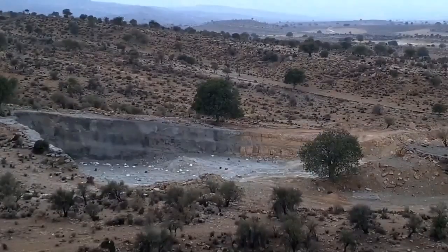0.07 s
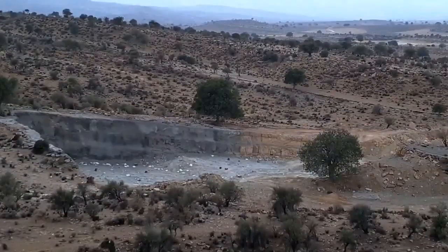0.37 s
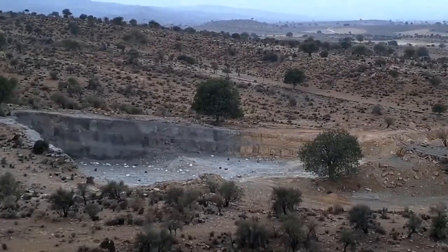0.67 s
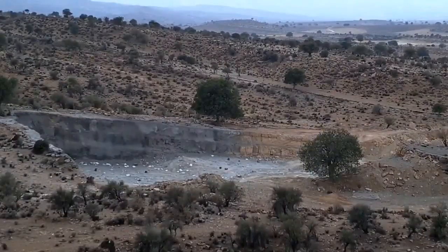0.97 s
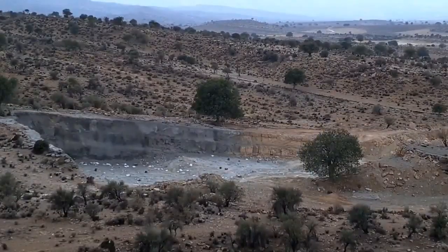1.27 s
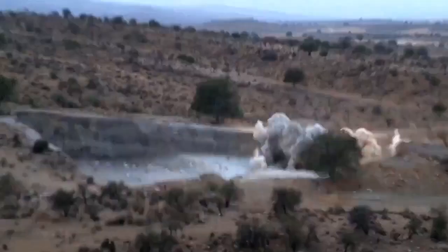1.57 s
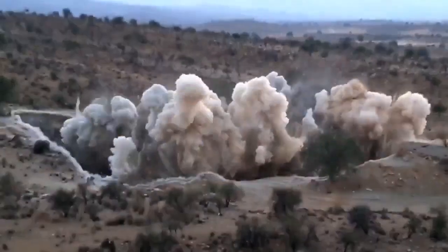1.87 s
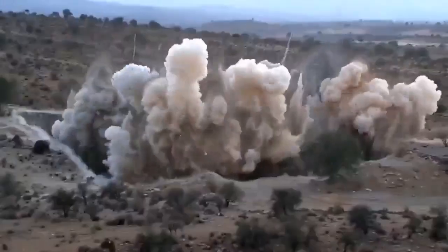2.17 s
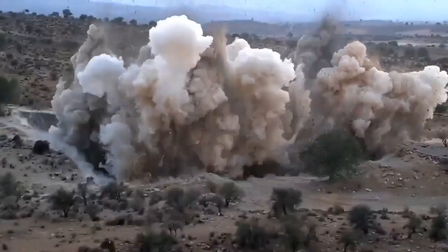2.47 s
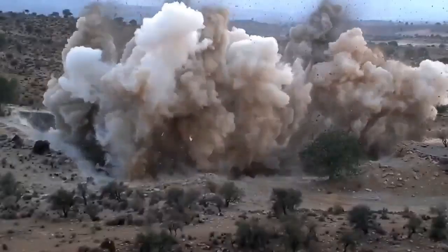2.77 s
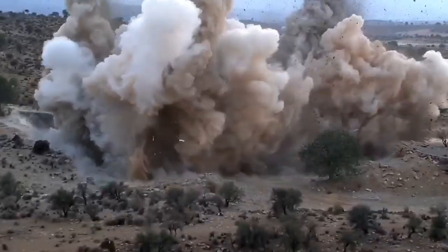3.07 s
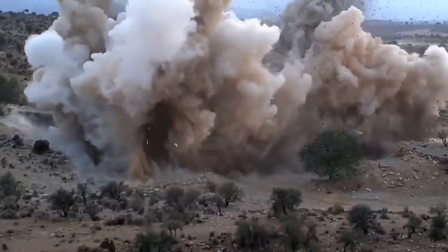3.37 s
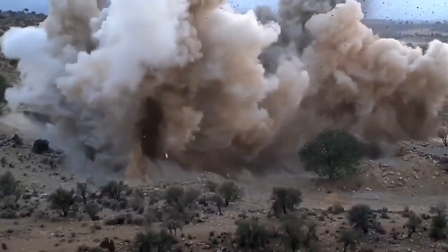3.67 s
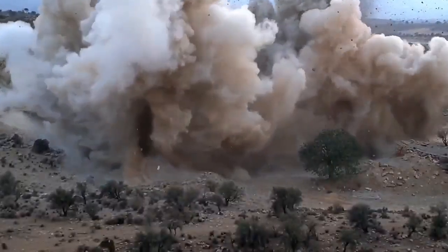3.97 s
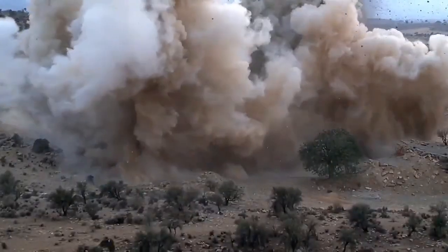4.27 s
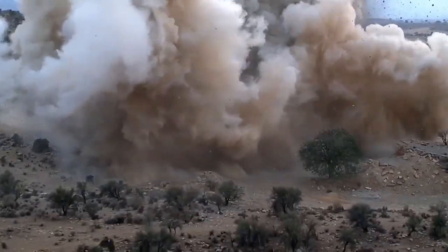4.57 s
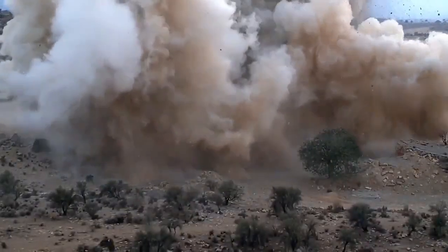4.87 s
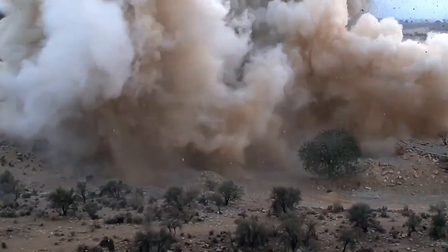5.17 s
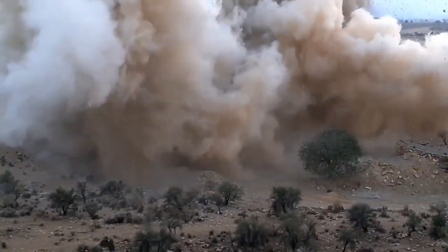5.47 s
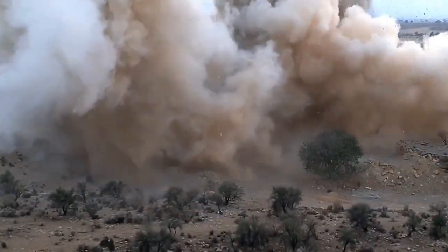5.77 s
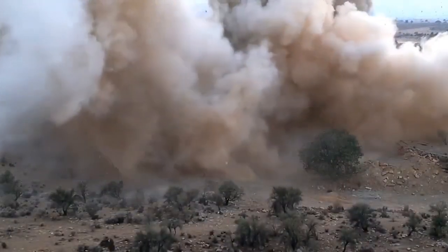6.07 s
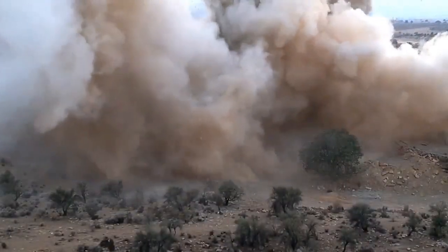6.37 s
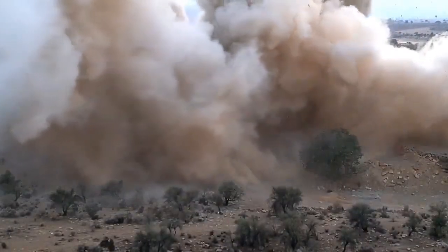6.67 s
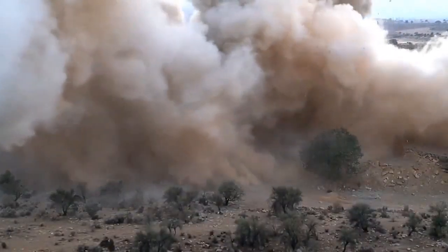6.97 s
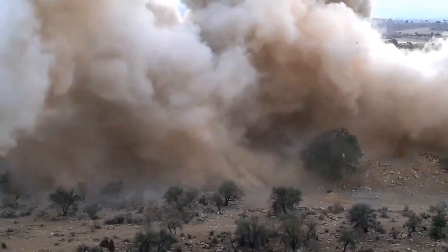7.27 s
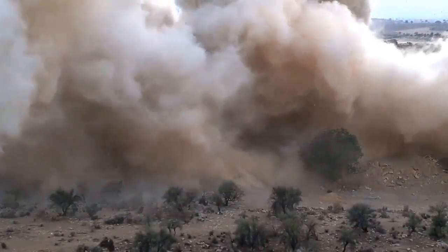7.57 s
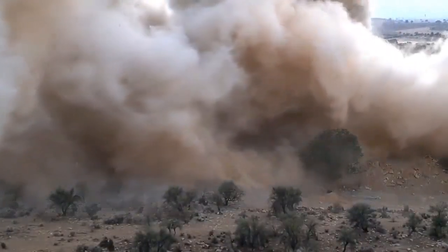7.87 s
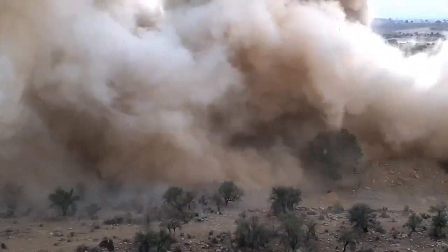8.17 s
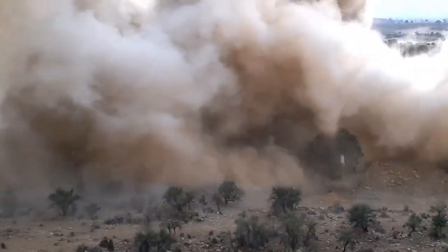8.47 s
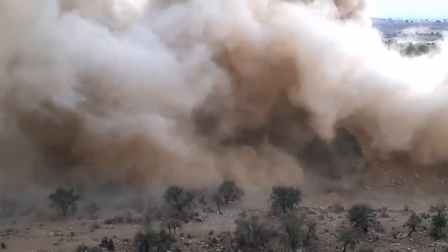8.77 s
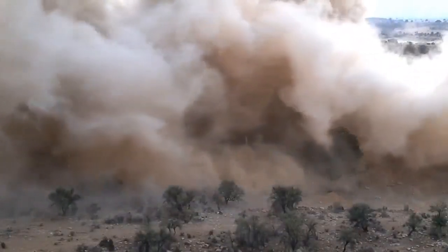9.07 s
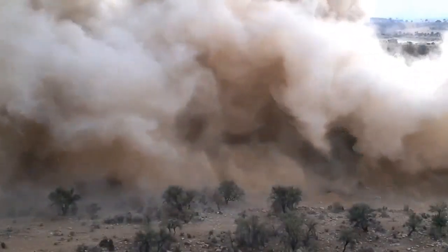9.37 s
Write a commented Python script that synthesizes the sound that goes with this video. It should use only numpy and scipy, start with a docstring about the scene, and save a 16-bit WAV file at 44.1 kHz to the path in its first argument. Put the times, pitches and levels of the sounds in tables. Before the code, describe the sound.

Wind buffets the microphone, then a quarry blast roars and rolls away, followed by a growing avalanche of thudding, clattering rock.

```python
"""A quarry face is blasted, heard from across a dry valley. First, turbulent gusts buffet the microphone.
Sound travels faster in rock than in air, so the shock arrives next as low thumps through the ground.
The face cracks, and at 2 s the air blast follows: a ragged roar of venting gas that rolls off the hills.
From 3.3 s thrown rock comes down in a growing avalanche under returning wind: boulders thud, stones
clatter and grit ticks, while sharp jolts ring the two microphone ports with a hollow clonk."""
import sys
import numpy as np
from scipy import signal
from scipy.fft import rfft, irfft, next_fast_len
from scipy.io import wavfile
from scipy.ndimage import uniform_filter1d, map_coordinates

SR = 44100
rng = np.random.default_rng(int(sys.argv[2]) if len(sys.argv) > 2 else 0)


def dump_mix(stems):
    """Bounce the given channels to the path in sys.argv[1] as a 16-bit WAV at rate SR."""
    frames = np.atleast_2d(stems).T  # one column per channel
    limited = np.clip(frames, -1, 1)  # hard clip at full scale
    pcm = np.round(limited * 32767).astype(np.int16)
    wavfile.write(sys.argv[1], SR, pcm)


N = 424683
TOP_HZ = 15900  # upper band limit
PORT_LAG_S = .00035  # the blast reaches the left port later
LOW_RING_HZ, HIGH_RING_HZ = 855, 1473  # two hollow resonances of the microphone ports

# spectra of the blast, coarse rock and fine rock: (frequency [Hz], relative level [dB])
ROAR_SPECTRUM = [(201, -21), (275, -2), (448, -1), (612, -10), (854, -8), (1190, -18), (1660, -17.5),
                 (2310, -24), (2870, -25), (8730, -41), (14800, -32.5), (16000, -55)]
RUBBLE_SPECTRUM = [(215, -21.5), (300, -0.5), (350, 2.5), (419, -1.5), (636, -5.5), (847, -3.5),
                   (1270, -12.5), (1770, -12), (2340, -26.5), (2600, -22), (3380, -44.5), (5720, -120)]
GRAVEL_SPECTRUM = [(1180, -29), (2000, 3.5), (2340, -13), (2810, -2), (3400, -10), (3950, -7),
                   (4900, -10.5), (5600, -7), (6100, -11.5), (6850, -9.5), (8630, -19), (10800, -16),
                   (14300, -20.5), (16000, -23.5)]


def amp(db):
    """Amplitude ratio of a level in decibels."""
    return 10 ** (np.asarray(db) / 20)


def unit(x):
    """Normalisation to rms 1."""
    return x / np.sqrt(np.mean(x ** 2) + 1e-20)


def along(points, hz):
    """Interpolation of (frequency [Hz], value) points on a logarithmic frequency axis."""
    frequencies, values = np.transpose(points)
    return np.interp(np.log(hz + 1), np.log(frequencies), values)


def wobble(rate):
    """Smooth random modulation: a spline through `rate` knots a second."""
    knots = rng.standard_normal(int(N * rate / SR) + 4)
    return map_coordinates(knots, [np.arange(N) * rate / SR])


def held(start_s, level_db, hold_s, release, attack=2500):
    """Exponential rise until start_s, a plateau, then exponential decay; slopes in dB/s."""
    t = np.arange(N) / SR - start_s
    return amp(level_db + attack * np.minimum(t, 0) - release * np.maximum(t - hold_s, 0))


def swell(hz, cycles):
    """Time axis and envelope of a wave packet, which rises and falls over a few cycles."""
    t = np.arange(-SR // 25, SR // 25) / SR
    return t, np.hanning(len(t)) / np.cosh(t * hz / cycles)


def add(track, s, sound):
    """Superposition: mix a stereo sound in at time s."""
    start = max(round(s * SR), 0)
    track[:, start:start + sound.shape[1]] += sound[:, :max(N - start, 0)]


def coloured(x, gain):
    """Minimum-phase filtering by gain(hz); folding the cepstrum makes the response causal."""
    size = 8192
    cepstrum = irfft(np.log(np.maximum(gain(np.fft.rfftfreq(size, 1 / SR)), 1e-6)))
    cepstrum[1:size // 2] *= 2
    cepstrum[size // 2 + 1:] = 0
    response = irfft(np.exp(rfft(cepstrum)))
    return signal.fftconvolve(np.atleast_2d(x), response[None], axes=1)[:, :x.shape[-1]]


def band(spectrum, low_hz, high_hz, order=8):
    """Gain function of one part of a spectrum, cut out by Butterworth slopes."""
    def gain(hz):
        low_cut = 1 + (low_hz / (hz + 1)) ** (2 * order)
        high_cut = 1 + (hz / high_hz) ** (2 * order)
        return amp(along(spectrum, hz)) / np.sqrt(low_cut * high_cut)
    return gain


def burst(t60, gain):
    """A transient of coloured stereo noise with exponential decay; peak 1."""
    t = np.arange(SR // 8) / SR
    puff = coloured(rng.standard_normal((2, len(t))) * amp(-60 * t / t60), gain)
    return puff / np.abs(puff).max()


def impacts(rate, spread_db, wash):
    """Shot noise in mid and side: `rate` random pulses a second over a wash of countless small ones."""
    count = int(rate * N / SR)
    when, size, lag, sign, side = rng.random((count, 5)).T
    push = np.sign(sign - .5) * amp(-spread_db * np.log(size + 0.015))
    at = (when * (N - 1)).astype(int)
    mid = np.bincount(at, push, N)
    across = np.bincount(at + (lag * 20).astype(int), push * (side - .5), N)[:N]
    return np.array([unit(mid), unit(across)]) + wash * rng.standard_normal((2, N))


def widen(mid, side):
    """Sum and difference give left and right; the ports differ most at their resonances."""
    # stereo width: (frequency [Hz], side gain [dB])
    width = [(99, -10), (160, -6), (270, -10.5), (450, -14.5), (690, -4), (860, 2.5), (1150, -4),
             (1470, 3.5), (1850, -1.5), (3330, 0.5), (5500, -4), (15000, -5)]
    side = coloured(side, lambda hz: amp(along(width, hz)))[0]
    return np.array([mid + side, mid - side])


def spread(pair, gain, crossing=0):
    """Random fading in time and frequency, then filtering: mid and side in, left and right out."""
    spectra = signal.stft(pair, nperseg=512)[2]
    patches = uniform_filter1d(rng.standard_normal(spectra.shape[1:]), size=5, axis=0)
    patches = uniform_filter1d(patches, size=5, axis=1)
    faded = signal.istft(spectra * amp(2 * unit(patches)), nperseg=512)[1][:, :N]
    mid, side = coloured(faded, gain)
    # a share of the sound crosses from one port to the other a moment later
    side = np.sqrt(abs(1 - crossing ** 2)) * side + crossing * np.roll(mid, round(PORT_LAG_S * SR))
    return widen(mid, side) / np.std(mid)


def hiss():
    """The noise floor: faint, steady Gaussian noise that falls off in the treble."""
    # hiss spectrum: (frequency [Hz], relative level [dB])
    spectrum = [(2000, -2.5), (8000, -8), (14000, -14.5)]
    return amp(-75) * unit(coloured(rng.standard_normal((2, N)), lambda hz: amp(along(spectrum, hz))))


def wind_strength():
    """Gains of buffet and flutter: arched gusts add in power to a breeze; steadier wind comes later."""
    # gusts: (start [s], length [s], buffet level [dB], flutter level [dB])
    gusts = [(0.01, 0.11, -24.5, -63.5), (0.126, 0.021, -25.5, -52), (0.404, 0.43, -23, -58),
             (0.646, 0.052, -18, -47), (0.939, 0.29, -26.5, -40.5), (1.032, 0.038, -26, -33.5),
             (1.098, 0.018, -32, -33), (1.391, 0.017, -27, -41.5), (1.413, 0.26, -30.5, -47.5),
             (1.527, 0.014, -32, -38.5), (1.558, 0.023, -27, -30), (1.669, 0.18, -24.5, -48.5),
             (1.845, 0.18, -23.5, -31)]
    # wind after the blast: (time [s], relative level [dB])
    late_wind = [(3.55, -45), (4.2, -40), (4.85, -35.5), (5.5, -33.5), (5.9, -39), (6.9, -38.5), (7.4, -43),
                 (9.55, -40)]
    # moments of calm: (time [s], half length [s], depth [dB])
    lulls = [(0.898, 0.029, 21), (5.122, 0.055, 15), (6.29, 0.11, 13)]
    rise, fall = 379.5, 350.5  # dB/s
    breeze_db, arch_db, flutter_swing = -45, 5.5, 1.9
    t = np.arange(N) / SR
    times, levels = np.transpose(late_wind)
    late = amp(np.interp(t, times, levels) + 7) * held(times[0], 0, N / SR, 0, attack=rise)
    buffet = np.maximum(late, amp(breeze_db))
    flutter = late * amp(-18) + amp(-91.5)
    for start, length, buffet_db, flutter_db in gusts:
        arch = amp(-arch_db * np.clip(2 * (t - start) / length - 1, -1, 1) ** 2)
        gust = arch * held(start, 0, length, fall, attack=rise)
        buffet = np.hypot(buffet, amp(buffet_db) * gust)
        flutter = np.hypot(flutter, amp(flutter_db) * gust ** flutter_swing)
    lull = amp(-sum(db * np.exp(-((t - s) / half) ** 4) for s, half, db in lulls))
    return buffet * lull, flutter * lull


def wind():
    """Turbulent pressure: eddies hit each port on its own, and the faster ones flutter higher."""
    # spectra of slow and fast eddies: (frequency [Hz], relative level [dB])
    buffet_spectrum = [(25, -19), (75, 3), (140, -6.5), (270, 2.5), (400, -4.5), (600, -15.5), (900, -20.5)]
    flutter_spectrum = [(600, 9.5), (850, 3.5), (1200, -14), (2000, -32), (4000, -52.5), (15000, -63.5)]
    # eddies that slap the ports: (time [s], relative level [dB], centre frequency [Hz])
    eddy_slaps = [(0.079, -4, 203), (0.141, -8, 267), (0.496, -7.5, 356), (0.58, -12, 234), (0.67, -8, 350),
                  (0.687, -7, 187), (1.045, -9, 400), (1.163, -10, 460), (1.396, -9.5, 353),
                  (1.437, -4, 387), (1.531, -15, 380), (1.575, -10.5, 343), (1.949, -14, 480)]
    buffet, flutter = wind_strength()
    slaps, surge = np.zeros((2, N)), np.ones((2, N))
    for s, db, hz in eddy_slaps:
        t, push = swell(hz, cycles=0.82)
        phase = 2 * np.pi * rng.random() + rng.uniform(-0.87, 0.53, (2, 1))
        add(slaps, s + 0.0021 + t[0], amp(db - 6.5) * push * np.cos(2 * np.pi * hz * t + phase))
        add(surge, s + 0.0026 + t[0], push[None])  # each slap stirs up the flutter
    eddies = amp(1.8 * wobble(70) + 1.8 * np.array([wobble(90), wobble(90)]))
    stir = lambda gain: unit(eddies * coloured(rng.standard_normal((2, N)), gain))
    slow = amp(-2) * buffet * stir(band(buffet_spectrum, 20, 430))
    blend = buffet * (flutter / (buffet + 1e-9)) ** 0.54
    medium = amp(8.5) * blend * stir(band(buffet_spectrum, 398, 618))
    crackles = unit(amp(3.7 * wobble(170)))
    fast = amp(5.5) * flutter * surge * crackles * stir(band(flutter_spectrum, 610, TOP_HZ))
    return (slow + medium + fast + slaps) * amp([[.6], [-.6]])


def port_clonks():
    """Cavity resonance: a jolt rings the air in the ports, the two sides nearly in antiphase."""
    # sharp jolts: (time [s], peak level [dB], resonance [Hz])
    jolts = [(4.007, -23, LOW_RING_HZ), (4.503, -19, LOW_RING_HZ), (4.68, -11, LOW_RING_HZ),
             (5.205, -21.5, HIGH_RING_HZ), (5.286, -10, LOW_RING_HZ), (5.452, -4, HIGH_RING_HZ),
             (6.151, -21, LOW_RING_HZ), (6.18, -19, LOW_RING_HZ), (6.298, -17, HIGH_RING_HZ),
             (6.724, -10.5, LOW_RING_HZ), (6.9953, -7, HIGH_RING_HZ), (7.8, -14, HIGH_RING_HZ),
             (8.187, -12, LOW_RING_HZ), (8.205, -11.5, HIGH_RING_HZ), (8.33, -12, HIGH_RING_HZ),
             (8.448, -16, HIGH_RING_HZ), (8.579, -14, LOW_RING_HZ), (8.698, -12, LOW_RING_HZ),
             (9.086, -8, HIGH_RING_HZ), (9.117, -11, LOW_RING_HZ), (9.372, -12.5, LOW_RING_HZ),
             (9.598, -8.5, HIGH_RING_HZ)]
    cycles_to_peak = 2.9
    out, t = np.zeros((2, N)), np.arange(SR // 25) / SR
    for s, db, hz in jolts:
        age = t * hz / cycles_to_peak
        phase = rng.normal(0, 0.14, (2, 1)) + np.pi * np.arange(2)[:, None]
        add(out, s, amp(db) * age * np.exp(1 - age) * np.sin(2 * np.pi * hz * t + phase))
    return out


def hills(x):
    """Reverberation: the slopes scatter a dull, diffuse tail, different on each side."""
    # decay in the valley: (frequency [Hz], reverberation time [s])
    decay_times = [(150, 0.56), (8000, 0.062)]
    hz, t, spectra = signal.stft(rng.standard_normal((2, SR)), SR, nperseg=256)
    decay = amp(-60 * t / along(decay_times, hz)[:, None])
    tail = signal.istft(spectra * decay, SR, nperseg=256)[1]
    return signal.fftconvolve(x, tail / np.linalg.norm(tail[0]), axes=1)[:, :N]


def ground():
    """Seismic waves: the charges fire in turn, each heaving the ground, which trembles on."""
    # spectrum of the tremor: (frequency [Hz], relative level [dB])
    rumble = [(20, -32), (42, -4.5), (55, 0.5), (77, 4), (105, -4), (220, -14.5), (400, -63)]
    # shocks through the ground: (time [s], relative level [dB])
    shocks = [(1.682, -8.5), (1.741, -14), (1.761, -12.5), (1.791, -11.5), (1.858, -15), (1.905, -13),
              (1.937, -6.5), (1.968, -16)]
    thump_hz, t60_s, attack_s = 74, 0.085, 0.0034
    tremor = spread(rng.standard_normal((2, N)), lambda hz: amp(along(rumble, hz)))
    heave = held(start_s=1.75, level_db=-30.5, hold_s=0.87, release=20) * tremor
    t = np.arange(SR // 8) / SR
    envelope = amp(-60 * t / t60_s) * (1 - np.exp(-t / attack_s))
    for s, db in shocks:
        hz = thump_hz * np.exp(rng.normal(0, 0.13))
        thump = envelope * np.sin(2 * np.pi * hz * t)
        add(heave, s, amp(db + 3) * thump[None])
    return heave * amp([[-1.3], [1.3]])


def pebbles(rate, pitch_hz, cycles, spread_db):
    """Damped free vibration: each struck pebble rings briefly at its own pitch; stereo, rms 1."""
    count = int(rate * N / SR)
    when, size, lag, side = rng.random((count, 4)).T[:, :, None]
    hz = np.clip(pitch_hz * np.exp(.4 * rng.standard_normal((count, 1))), 1200, 7000)
    samples = np.arange(SR // 50)
    t = samples / SR
    strength = amp(-spread_db * np.log(size + 0.023)) * (pitch_hz / hz) ** .5
    ring = strength * np.sin(2 * np.pi * hz * t) * np.exp(-hz * t / cycles) * (1 - np.exp(-hz * t))
    at = (when * N).astype(int) + samples
    left = np.bincount(at.ravel(), (ring * np.sqrt(side)).ravel(), N)[:N]
    right = np.bincount((at + (lag * 10).astype(int)).ravel(), (ring * np.sqrt(1 - side)).ravel(), N)[:N]
    return unit(np.array([left, right]))


def rock_flow():
    """Granular flow: the gains of boulders, stones, gravel and sand grow as powers of it, sand last."""
    # flow of the sliding rock: (time [s], level [dB])
    flow = [(3.3, -62.5), (3.6, -54.5), (3.95, -48), (4.45, -44.5), (5.85, -45.5), (6.6, -42.5),
            (7.0, -37.5), (7.3, -39.5), (8.05, -39.5), (8.45, -35.5), (9.6, -37.5)]
    # showers as slabs give way: (start [s], length [s], stone level [dB], boulder level [dB])
    showers = [(3.645, 0.38, -42.5, -48), (4.507, 0.11, -34.5, -35), (4.837, 0.014, -26.5, -36),
               (5.2, 0.06, -32, -32), (5.267, 0.024, -25, -27), (5.455, 0.18, -41, -37),
               (6.728, 0.055, -21.5, -35), (6.83, .07, -28.5, -39), (6.958, 0.14, -24.5, -32.5)]
    full_flow_db, sand_free_s = -37, 5.68
    flow_rise, sand_rise = 60.5, 17  # dB/s
    t = np.arange(N) / SR
    times, levels = np.transpose(flow)
    flow_db = np.interp(t, times, levels) - full_flow_db + flow_rise * np.minimum(t - times[0], 0)
    boulders = amp(-27 + 0.92 * flow_db)
    stones = amp(-29 + 0.76 * flow_db)
    gravel = amp(-37.5 + flow_db)
    sand = amp(-48.5 + 1.4 * flow_db + sand_rise * np.minimum(t - sand_free_s, 0))
    for start, length, stones_db, boulders_db in showers:
        shower = held(start, 0, length, release=380, attack=900)
        stones = np.hypot(stones, amp(stones_db) * shower)
        boulders = np.hypot(boulders, amp(boulders_db) * shower)
    return boulders, stones, gravel, sand


def avalanche():
    """Countless collisions sum incoherently: the smaller the rock, the higher its knocks."""
    boulders, stones, gravel, sand = rock_flow()
    clumps = wobble(35)
    fine = gravel * (sand / (gravel + 1e-9)) ** 0.25  # the gravel brightens as the sand starts to run
    thuds = boulders * spread(impacts(110, 2.2, wash=0.72), band(RUBBLE_SPECTRUM, 263, 626))
    clatter = stones * spread(impacts(220, 2.6, wash=0.98), band(RUBBLE_SPECTRUM, 633, 2620))
    rattle = amp(-2) * gravel * spread(impacts(500, 3.3, wash=1), band(GRAVEL_SPECTRUM, 2090, 3540))
    grit = fine * spread(impacts(900, 3.9, wash=1.26), band(GRAVEL_SPECTRUM, 3340, 7980))
    clacks = fine * pebbles(rate=70, pitch_hz=2700, cycles=8, spread_db=5.2)
    trickle = sand * amp(2.5 * wobble(40))
    fizz = trickle * spread(impacts(560, 4.2, wash=1), band(GRAVEL_SPECTRUM, 8500, TOP_HZ))
    return (thuds + clatter) * amp(1.18 * clumps) + (rattle + grit + clacks + fizz) * amp(1.43 * clumps)


def landings():
    """Inelastic impact: a boulder lands with a heavily damped knock; smaller rocks crunch more."""
    # heavy landings: (time [s], level [dB], pitch [Hz])
    falls = [(4.003, -15.5, 440), (4.503, -12.5, 382), (4.627, -14.5, 454), (4.682, -10.5, 387),
             (4.841, -11, 474), (4.932, -14, 450), (5.233, -14, 320), (5.287, -11, 804), (5.452, -8.5, 407),
             (5.627, -11.5, 330), (5.986, -18, 438), (6.151, -16, 827), (6.911, -11, 328),
             (6.994, -11.5, 865), (7.095, -11, 330), (7.296, -16, 556), (7.6, -1.5, 340),
             (7.702, -11.5, 325), (7.8, -12.5, 596), (7.885, -13, 390), (8.092, -11, 325),
             (8.333, -12.5, 349), (8.411, -11, 420), (8.48, -9, 323), (8.557, -10.5, 417),
             (8.673, -12, 370), (8.697, -9.5, 390), (8.837, -10.5, 360), (8.971, -6.5, 395),
             (9.117, -9, 520), (9.271, -11.5, 400), (9.346, -13, 513), (9.369, -7, 397), (9.598, -8, 560)]
    t60_s, attack_s, crunch_db_per_octave = 0.044, 0.00072, 5
    out, t = np.zeros((2, N)), np.arange(SR // 8) / SR
    for s, db, hz in falls:
        age = np.maximum(t - rng.uniform(0, 0.00033, (2, 1)), 0)  # each port has its own delay
        ring = np.sin(2 * np.pi * hz * age) * amp(-60 * age / t60_s) * (1 - np.exp(-age / attack_s))
        knock = coloured(ring, lambda f: 1 / np.sqrt(1 + (250 / (f + 1)) ** 8))
        crunch_db = -4.5 + crunch_db_per_octave * np.log2(hz / 400)
        crunch = amp(crunch_db) * burst(t60=0.047, gain=band(RUBBLE_SPECTRUM, 400, 2100))
        add(out, s, amp(db) * (knock + widen(*crunch)))
    return out


def chips():
    """Brittle fracture: rock splits with a bright snap, and the broken piece clacks at its resonance."""
    # splitting stone: (time [s], snap level [dB], relative clack level [dB], clack pitch [Hz])
    splits = [(1.697, -64, 16, 1800), (1.76, -68.5, 23, 1870), (1.877, -32.5, -4, 1900),
              (1.906, -28, -4, 1620), (2.0215, -16.5, 5.5, 1955), (2.136, -12.5, -8.5, 1590),
              (2.178, -12, -8, 1810), (2.2817, -17, -2.5, 2030), (6.044, -23, -7, 1640),
              (6.2985, -24, 7.5, 2000), (7.298, -28, 3, 1750), (7.801, -29.5, 9, 1600),
              (7.9738, -17, -13, 1970), (8.328, -17, 0, 3520), (8.558, -24.5, 6.5, 2900),
              (8.94, -18.5, -3, 1840), (9.3677, -22, 6.5, 2200)]
    out = np.zeros((2, N))
    for s, db, clack_db, hz in splits:
        snap = burst(t60=0.041, gain=band(GRAVEL_SPECTRUM, 3500, TOP_HZ))
        resonance = lambda f: (1 + (2 * (f / hz - hz / (f + 1))) ** 2) ** -2
        clack = amp(clack_db + 6) * burst(t60=0.031, gain=resonance)
        add(out, s, amp(db) * (snap + clack))
    return out


def fracture():
    """Acoustic emission: cracks run through the face, a crackle that builds before the gas escapes."""
    crackle = spread(impacts(500, 4, wash=.6), band(ROAR_SPECTRUM, 1300, 7000, order=2))
    envelope = held(start_s=1.872, level_db=-47.5, hold_s=-0.06, release=110, attack=259)
    return envelope * amp(2.5 * wobble(80)) * crackle


def booms():
    """Sudden expansion: big pockets of gas break out, each a pressure pulse a few cycles long."""
    # heaviest bursts of gas: (time [s], peak level [dB], centre frequency [Hz])
    pockets = [(2.113, -12, 480), (2.219, -6, 451), (2.238, -5.5, 358), (2.264, -6, 383),
               (2.309, -6.5, 322), (2.325, -11.5, 260)]
    out, lag = np.zeros((2, N)), np.array([[PORT_LAG_S], [0]])
    for s, db, hz in pockets:
        t, push = swell(hz, cycles=1.4)
        add(out, s + t[0], amp(db) * push * np.cos(2 * np.pi * (hz * (t - lag) + rng.random())))
    return out


def blast():
    """Gas leaves the holes as shock waves, the treble dying first; the hills reflect a smooth roll."""
    arrival_s, surge_s, echo_s = 2.022, 2.24, 2.73
    crossing, air_loss_db_per_hz = .35, .0014
    t = np.arange(N) / SR
    surge = amp(4.5 * np.exp(-((t - surge_s) / .035) ** 2))  # venting peaks just before it dies
    pulsing = amp(.8 * wobble(110))  # the holes vent unevenly
    roar = spread(impacts(400, 1.3, wash=0.86), band(ROAR_SPECTRUM, 200, 1036))
    roar *= held(arrival_s, level_db=-17.5, hold_s=0.32, release=130)
    crackle = spread(impacts(800, 3, wash=.85), band(ROAR_SPECTRUM, 854, 7000), crossing)
    crackle *= held(arrival_s, level_db=-20, hold_s=0.14, release=67)
    tearing = spread(impacts(1200, 4.4, wash=.7), band(ROAR_SPECTRUM, 5700, TOP_HZ))
    tearing *= held(arrival_s, level_db=-30, hold_s=0.17, release=300)
    # air absorbs the treble on the way round the hills
    dulled = lambda hz: band(ROAR_SPECTRUM, 170, 7500)(hz) * amp(-air_loss_db_per_hz * hz)
    roll = spread(rng.standard_normal((2, N)), dulled, crossing)
    roll *= held(arrival_s, level_db=-23, hold_s=0.36, release=19.4)
    echo = amp(2.5 * np.exp(-((t - echo_s) / 0.06) ** 2))  # the far slope stands out of the roll
    return roar * surge + (crackle + tearing) * pulsing + roll * echo


def scene():
    """Superposition of hiss, wind, blast and rockfall; landings and chips reverberate off the hills."""
    rocks = landings() + chips()
    background = hiss() + wind()
    explosion = ground() + fracture() + blast() + booms()
    return background + explosion + avalanche() + rocks + port_clonks() + amp(-12.5) * hills(rocks)


def record(dry):
    """Soft saturation rounds off the highest peaks; a low-pass removes all above the band limit."""
    rounded = dry / (1 + np.abs(dry / .95) ** 6) ** (1 / 6)
    size = next_fast_len(N + SR // 2)
    passband = np.fft.rfftfreq(size, 1 / SR) < TOP_HZ
    return irfft(rfft(rounded, size) * passband, size)[:, :N]


dry = scene()
out = record(dry)
dump_mix(out)
```